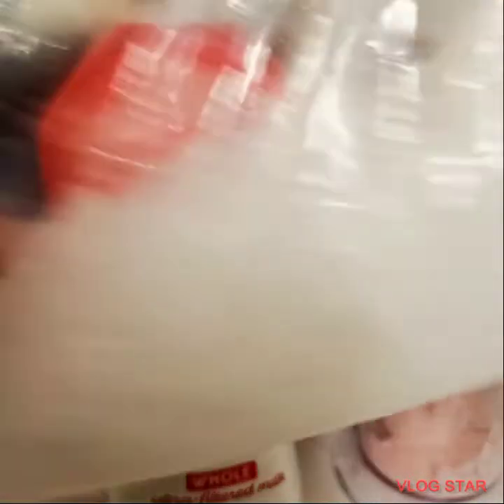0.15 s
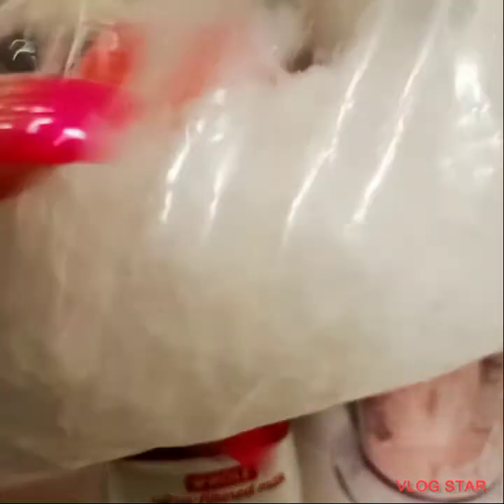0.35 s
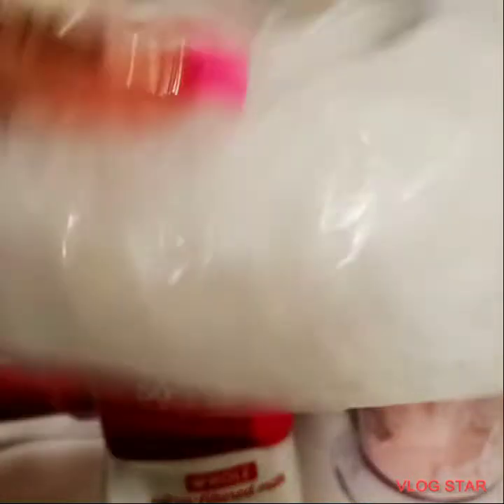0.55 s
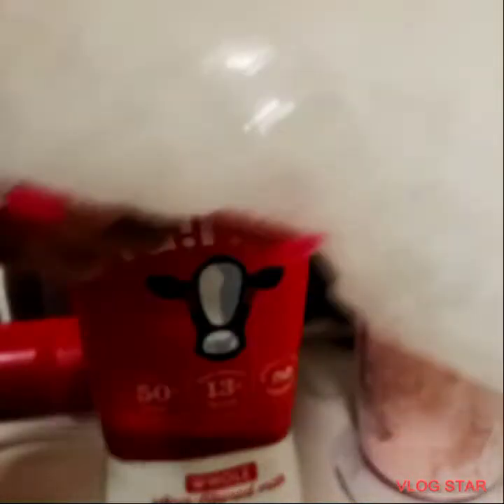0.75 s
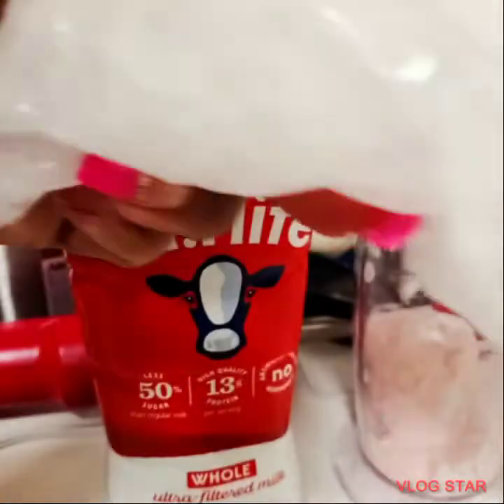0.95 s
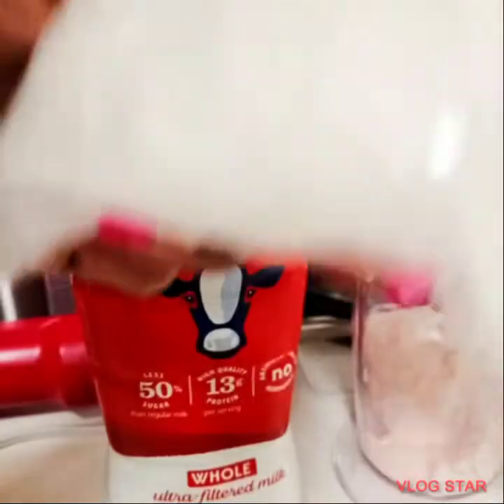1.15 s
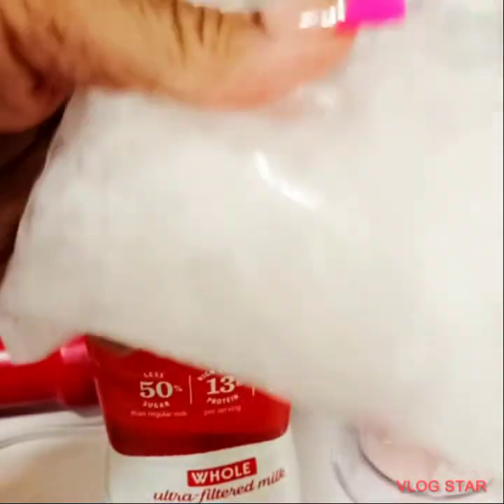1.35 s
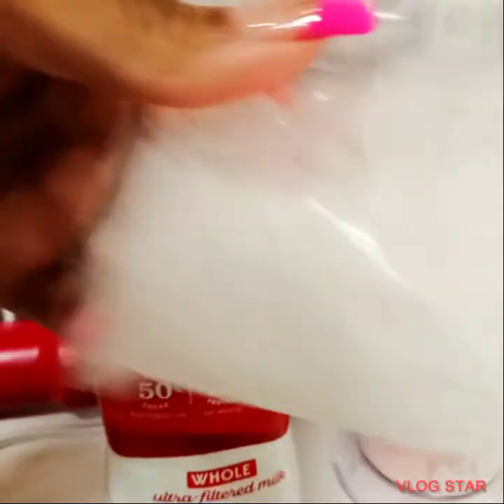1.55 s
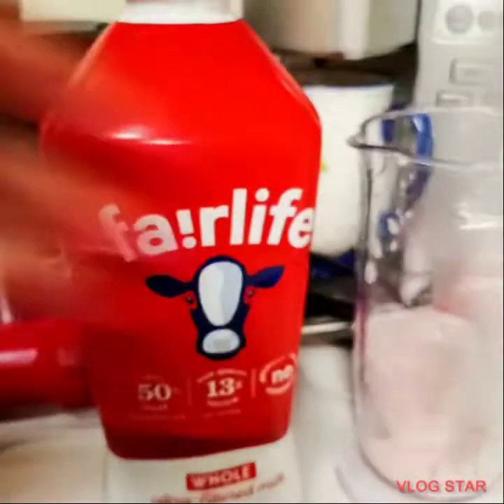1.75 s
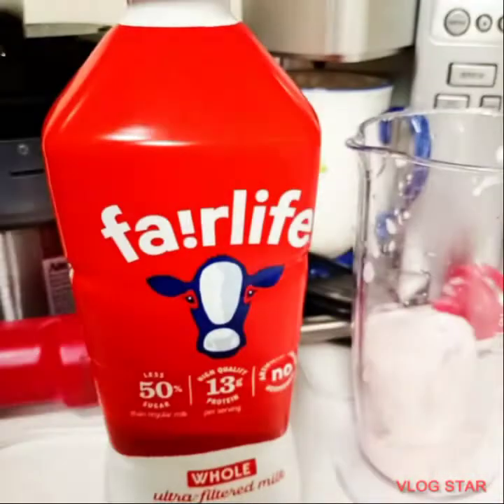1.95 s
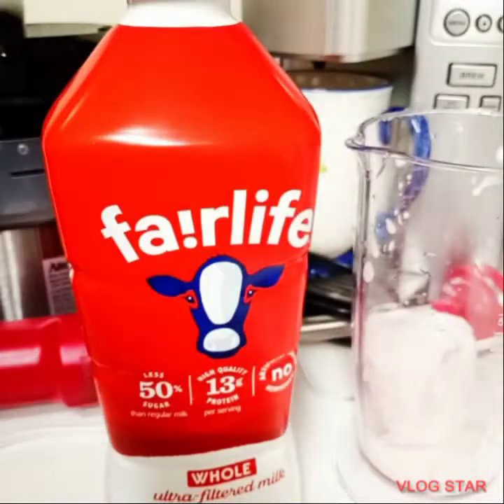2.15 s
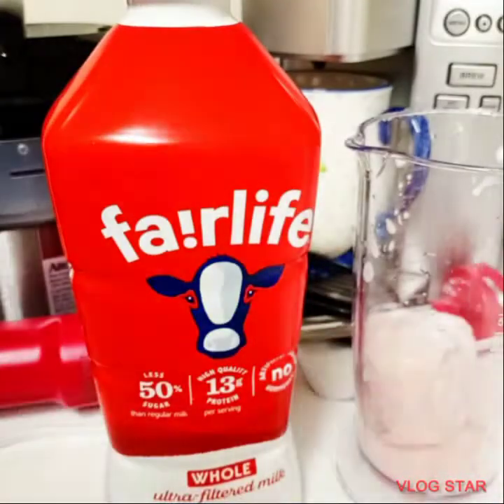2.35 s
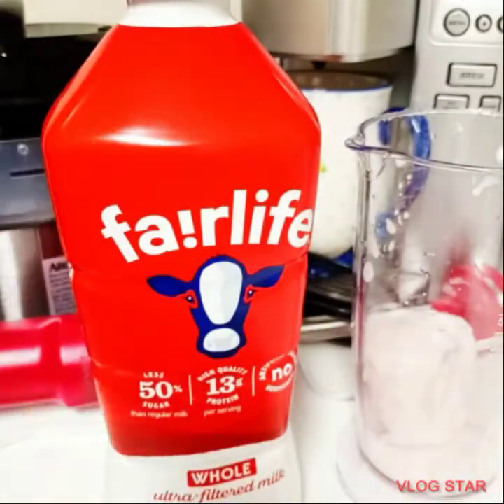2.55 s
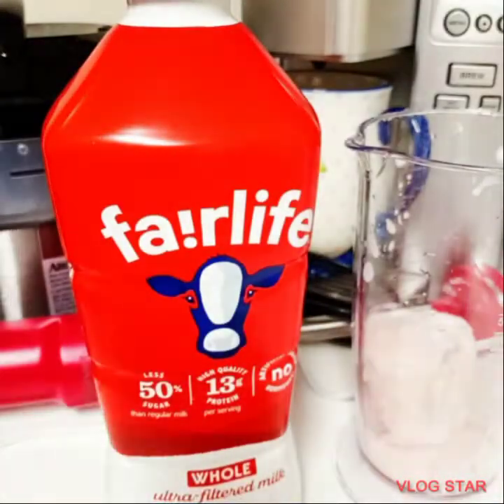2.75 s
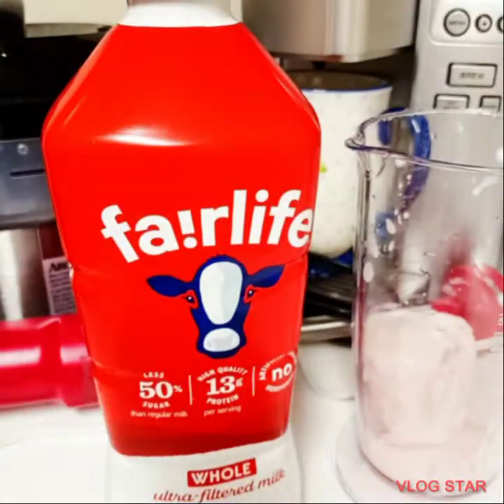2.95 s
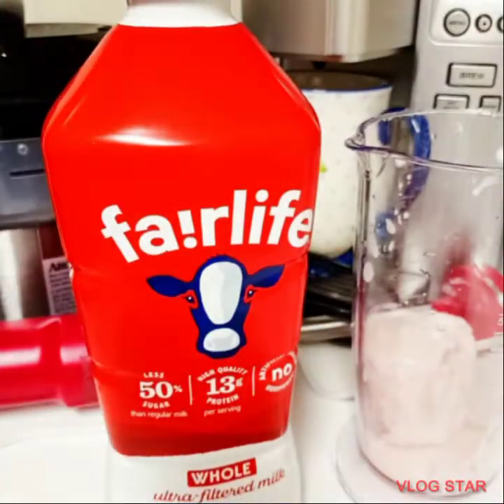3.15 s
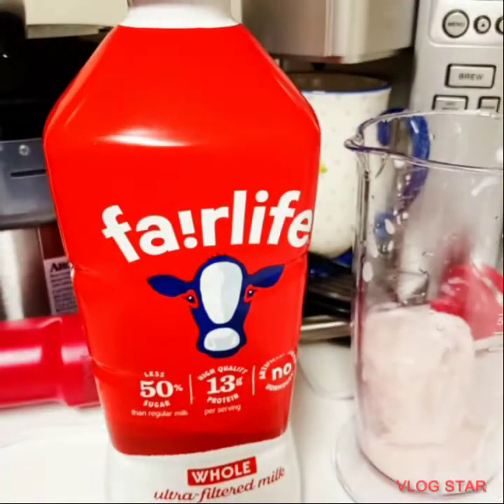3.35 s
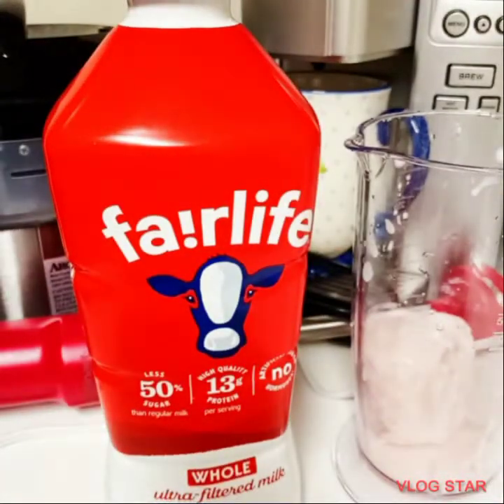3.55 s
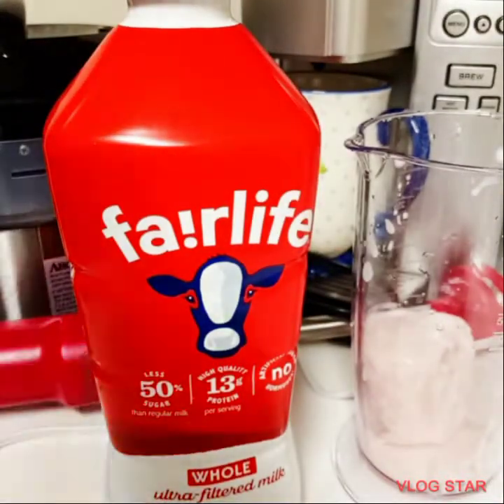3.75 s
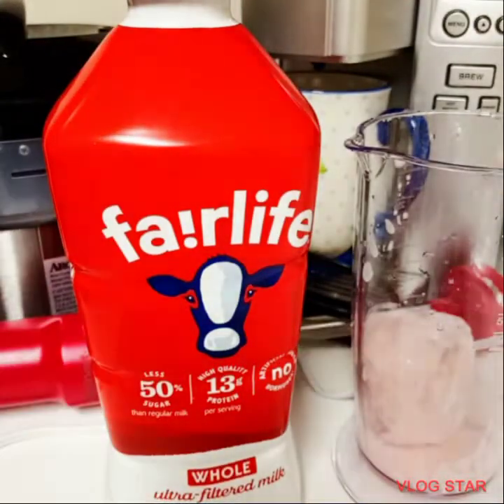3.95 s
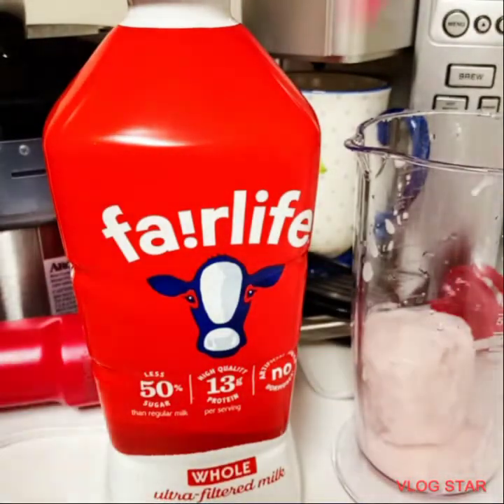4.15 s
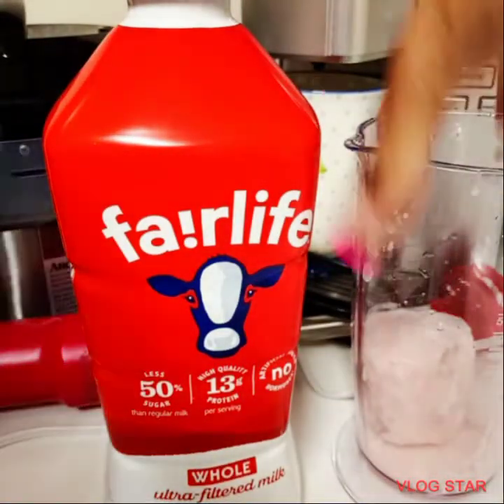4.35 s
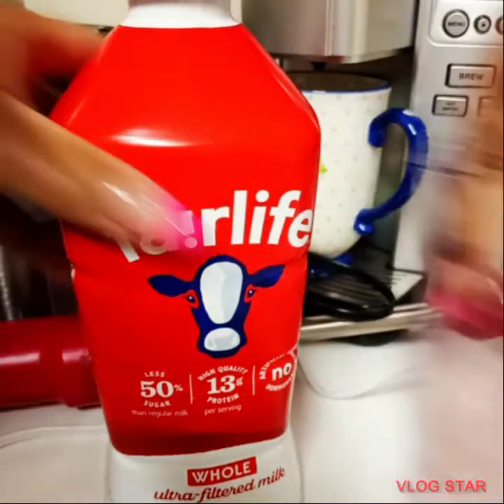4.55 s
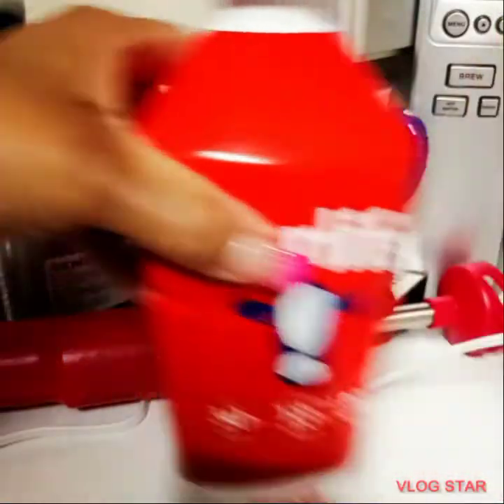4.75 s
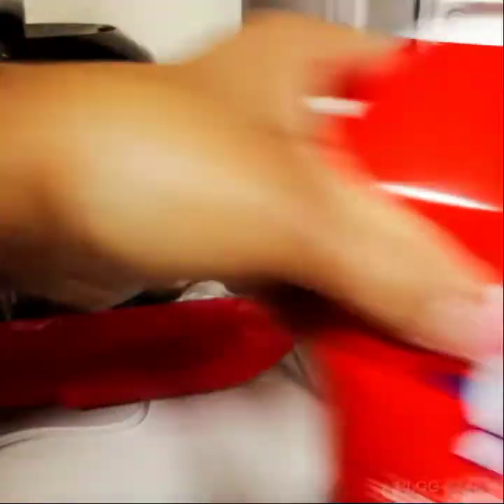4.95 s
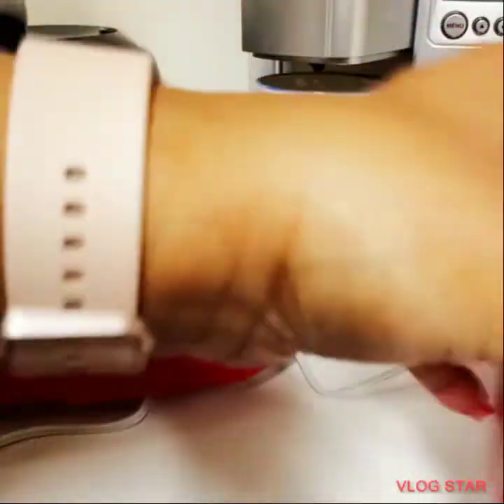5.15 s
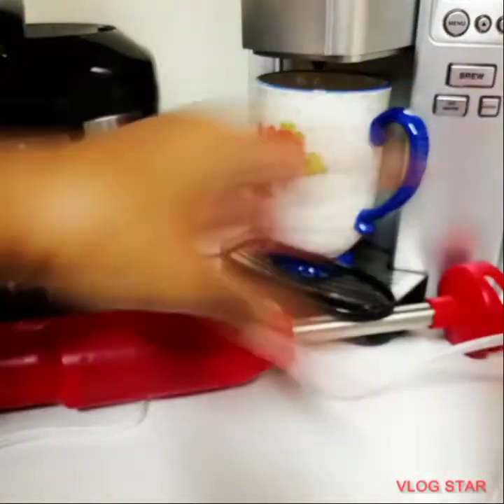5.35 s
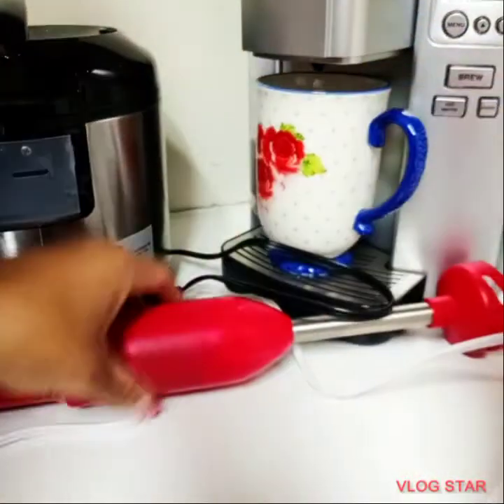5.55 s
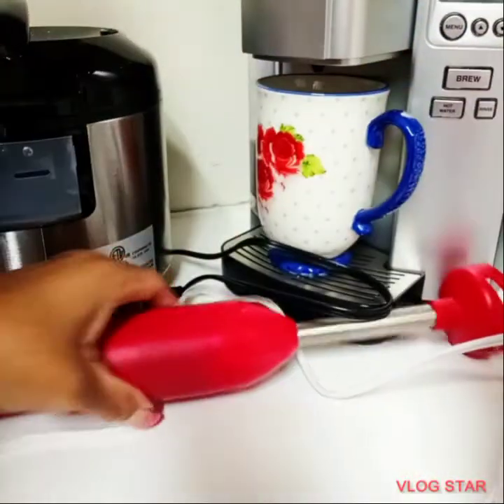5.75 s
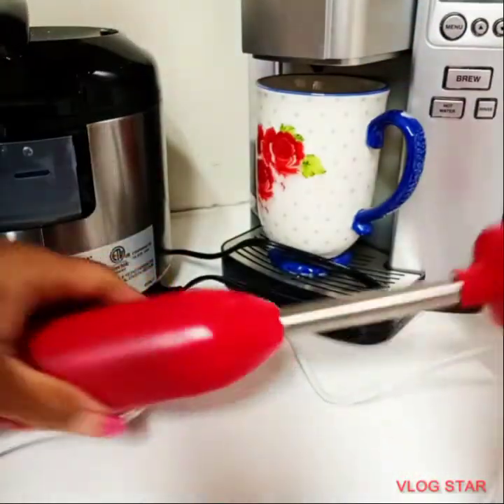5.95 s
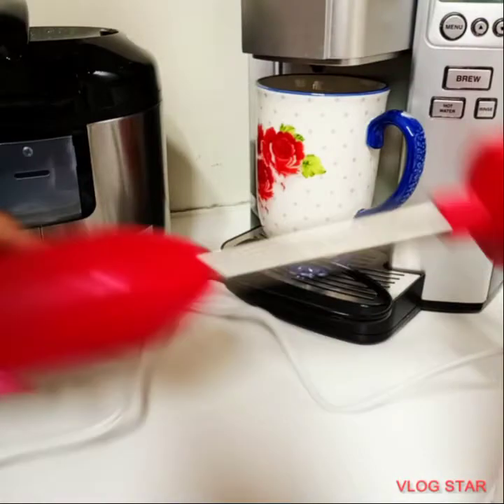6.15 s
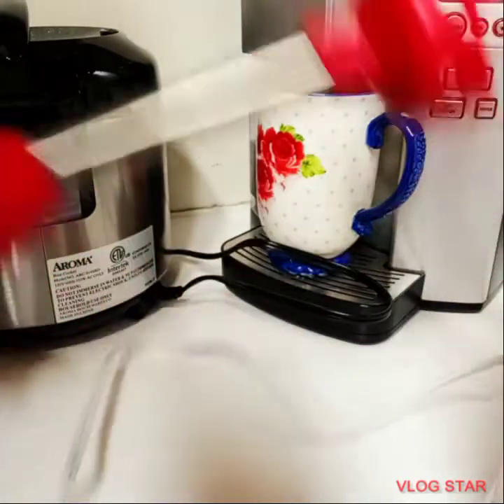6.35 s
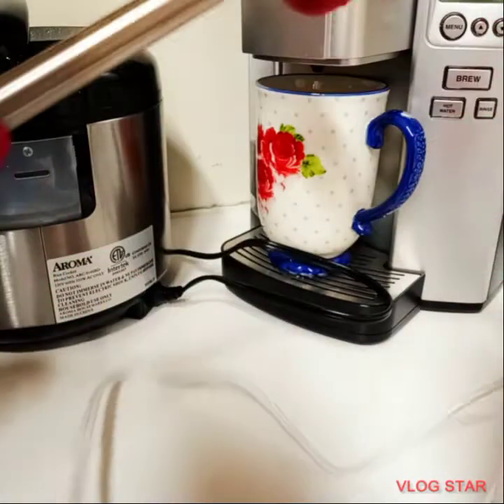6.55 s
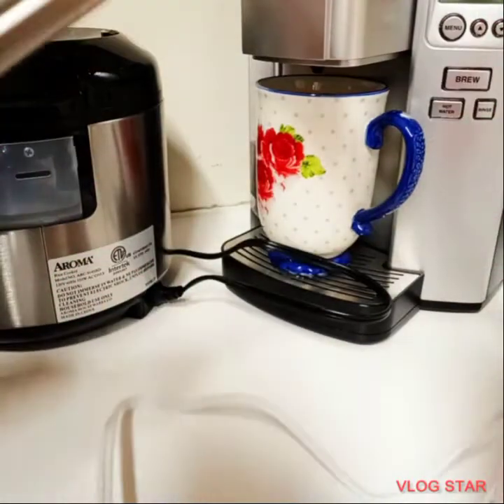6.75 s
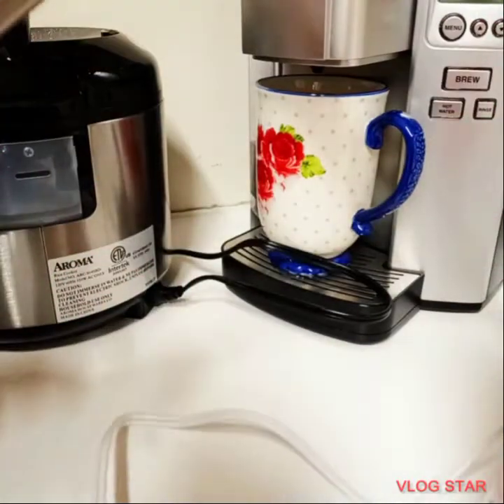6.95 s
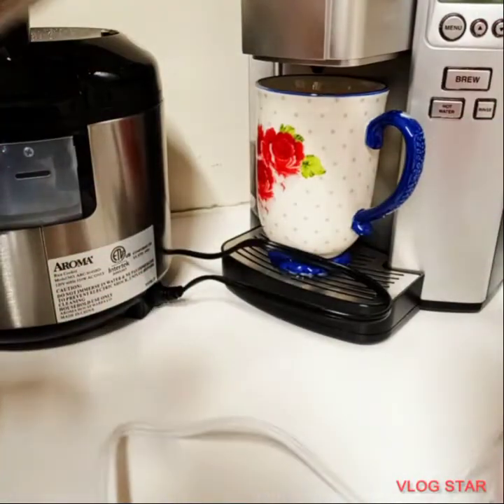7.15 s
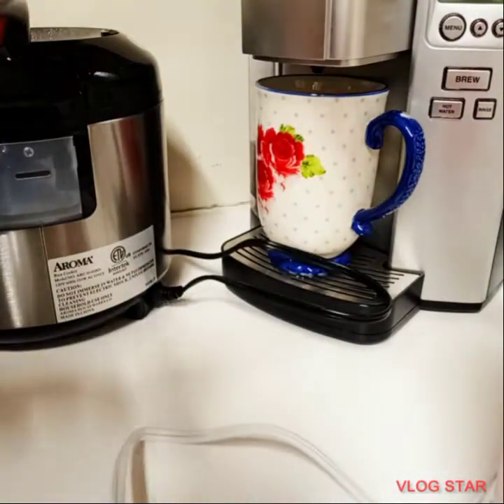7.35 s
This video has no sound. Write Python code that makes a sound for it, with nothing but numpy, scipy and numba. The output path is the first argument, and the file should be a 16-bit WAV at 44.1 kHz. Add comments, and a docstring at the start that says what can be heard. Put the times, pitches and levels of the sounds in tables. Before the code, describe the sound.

Close, crisp ice-bag rustling and snapping, a heavy drop, a quiet pause, then plastic sliding, sharp taps and a dragging cable in a kitchen.

```python
"""Crushed ice crunches and crackles in a film bag kneaded close to a phone on a kitchen worktop, then drops
aside; a plastic bottle and beaker scrape away, a stick blender is lifted and rattles, its cable drags behind.
Contact sounds are pings: dense rain for rustle and scrape, narrow for resonances, longer for squeaks and thuds.
A small hard room adds a decaying noise tail; shaped noise, a sine hum and a whine make the background."""
import sys
import numpy as np
from scipy import signal
from scipy.fft import rfft, irfft, next_fast_len
from scipy.io import wavfile
from scipy.ndimage import uniform_filter1d, map_coordinates
from numba import njit

SR = 44100
rng = np.random.default_rng(int(sys.argv[2]) if len(sys.argv) > 2 else 0)


def store_pcm(level_fs):
    """Save levels as 16-bit WAV."""
    pcm = np.round(np.clip(level_fs, -1, 1) * 32767).astype(np.int16)
    wavfile.write(sys.argv[1], SR, np.atleast_2d(pcm).T)


N = 330309
HZ = np.fft.rfftfreq(next_fast_len(N + SR), 1 / SR)
HANDLING_TRIM_DB = -3.5  # on bag, bottle and cable; their table levels are before this trim
BAG_PAN_DB, CABLE_PAN_DB = 0.1, 2.5  # left minus right


def undb(db):
    """Level in dB to amplitude factor."""
    return 10 ** (np.asarray(db) / 20)


def on_log(hz, table):
    """Read (Hz, value) rows on a log-frequency axis."""
    f, v = np.transpose(table)
    return np.interp(np.log(np.maximum(hz, 1)), np.log(f), v)


def mic_db(hz):
    """Colour of the phone's ports; flat below 1 kHz."""
    # response of the ports: (frequency [Hz], gain [dB])
    response = [(590, -33), (1000, -3.5), (1070, -0.5), (1350, -2), (1970, 1), (2180, -2.5), (3480, 0),
                (5610, -3), (6600, 1.5), (7250, -5), (8150, -17), (10600, -6.5), (13400, -21),
                (15100, -6.5), (16200, -16)]
    return on_log(hz, response[1:-1])


def shape(x, gain):
    """Filter by a gain per frequency bin."""
    size = next_fast_len(N + SR)
    return irfft(rfft(x, size) * gain, size)[..., :N]


def walk(rate_hz):
    """Slow chance with spread near 1."""
    k = int(SR / rate_hz)
    steps = np.repeat(rng.standard_normal(N // k + 1), k)
    return 1.3 * uniform_filter1d(uniform_filter1d(steps, k), k)[:N]


@njit
def ring(start, hz, tau, left, right, n):
    """Each ping swells and dies as t exp(-t / tau); left and right carry its size and phase at each port."""
    out = np.zeros((2, n))
    for g in range(len(hz)):
        p = np.exp(2j * np.pi * hz[g] / SR - 1 / tau[g])
        z = np.e / tau[g] + 0j  # envelope peaks at 1
        for i in range(min(int(8 * tau[g]), n - start[g])):
            out[0, start[g] + i] += i * (z * left[g]).imag
            out[1, start[g] + i] += i * (z * right[g]).imag
            z *= p
    return out


def pings(s, hz, cycles, size, pan_db, lag_ms=0.2335, wide_db=3.0):
    """Every ping comes from its own spot: it reaches the two ports at different phases and levels."""
    turn, lag, side = rng.random((len(s), 3)).T
    pan_db = pan_db + wide_db * 2 * (2 * side - 1)
    left = size * undb(pan_db / 2) * np.exp(2j * np.pi * turn)
    lag_turns = hz * lag_ms / 1000 * 2 * lag  # lag_ms is the mean
    right = left * undb(-pan_db) * np.exp(2j * np.pi * lag_turns)
    start = np.clip(s * SR, 0, N - 1).astype(np.int64)
    return ring(start, hz, cycles * SR / hz, left, right, N)


def ping_energy(hz, cycles):
    """Energy of a ping of size 1: amplitude squared times seconds."""
    return np.e ** 2 * cycles / hz / 8


def levels(s, weight, middle, main, fizz, pan_db):
    """Rows (time [s], four band levels [dB], left minus right [dB])."""
    return np.transpose(np.broadcast_arrays(s, weight, middle, main, fizz, pan_db))


def density_db(table, bands, when, hz):
    """Level per Hz at the source: each band's level is spread evenly over the band."""
    s, *band_levels_db, _ = np.transpose(table)
    per_hz = []
    for db, band in zip(band_levels_db, bands):
        heard_power = np.sum(undb(2 * mic_db(np.arange(*band))))
        per_hz.append(np.interp(when, s, db) - 10 * np.log10(heard_power))
    place = np.interp(np.log(hz), np.log(np.ravel(bands)), np.repeat(np.arange(4), 2))
    return map_coordinates(np.array(per_hz), [place, np.arange(len(hz))], order=1)


def rain(table, rate, scatter_db):
    """Times, sample places, sizes (rms 1, a few much larger) and pans of a rain of pings."""
    t0, t1 = table[0][0], table[-1][0]
    when, luck = rng.random((int(rate * (t1 - t0)), 2)).T
    when = t0 + when * (t1 - t0)
    size = undb(-scatter_db * np.log(np.maximum(luck, 1e-3)))
    pan_db = np.interp(when, *np.transpose(table)[[0, -1]])
    return when, (when * SR).astype(int), size / np.sqrt(np.mean(size ** 2)), pan_db


def rustle(table, bands, scatter_db, cycles, patchy_db, rate=14000):
    """Dense short pings of every pitch, coming in patches; rate in pings per second."""
    when, at, size, pan_db = rain(table, rate, scatter_db)
    low, high = np.sqrt(75), np.sqrt(17000)
    hz = (low + rng.random(len(when)) * (high - low)) ** 2
    share = 1 / (2 * np.sqrt(hz) * (high - low))  # share of the pings per Hz
    db = density_db(table, bands, when, hz) + patchy_db * walk(40)[at]
    size = size * undb(db) / np.sqrt(rate * share * ping_energy(hz, cycles))
    return pings(when, hz, cycles, size, pan_db)


def resonances(table, bands, modes, drift, come_go_db, rate=150):
    """Pings gathered on a few pitches that drift slightly and come and go."""
    out = 0
    for f, width_hz, over_db in modes:
        when, at, size, pan_db = rain(table, rate, 1.1)
        hz = f * (1 + drift * walk(3.3)[at])
        cycles = hz / width_hz / 5
        db = density_db(table, bands, when, hz) + over_db + come_go_db * walk(7)[at]
        size = size * undb(db) * np.sqrt(width_hz / (rate * ping_energy(hz, cycles)))
        out = out + pings(when, hz, cycles, size, pan_db)
    return out


def ticks(table, spread_ms, low_db, thin_db_oct, top_db, count=64):
    """One clear ping and a shower of splinters that thins out; the higher the ring, the weaker the low ones."""
    # pitches of the splinters: (lowest [Hz], dull [Hz], bright [Hz], highest [Hz])
    splinter_hz = (700, 2000, 4600, 11000)
    s, db, hz, dull_db, bright_db, pan_db = (np.repeat(c, count) for c in np.transpose(table))
    pan_db = np.clip(pan_db, -9, 9)
    octaves_up = np.clip(np.log2(hz / splinter_hz[1]), 0, None)
    lowest_db = dull_db + low_db - thin_db_oct * octaves_up
    splinter_db = np.array([lowest_db, dull_db, bright_db, bright_db + top_db])
    late, pitch = rng.random((len(s), 2)).T
    late_s = -np.log(late) * spread_ms / 1000
    # splinters are spread over a log pitch scale: place 0 is the lowest pitch, 3 the highest
    place = 4 * (np.arange(len(s)) % count + pitch) / count - .7
    f = np.clip(splinter_hz[0] * (splinter_hz[3] / splinter_hz[0]) ** (place / 3), 200, 17000)
    level_db = map_coordinates(splinter_db, [np.clip(place, 0, 3), np.arange(len(s))], order=1)
    shower = pings(s + late_s, f, 1.21 * (f / 2000) ** 0.23, undb(level_db - mic_db(f)), pan_db)
    k = slice(None, None, count)
    clear = pings(s[k], hz[k], 1.2, undb(db[k] - mic_db(hz[k])), pan_db[k], lag_ms=.02, wide_db=0.)
    return shower + clear


def kneading():
    """Fizz follows the film; the lumps follow film and weight of the shifting ice."""
    # kneading: (time [s], film level [dB], weight of shifting ice [dB])
    strokes = [(0.0, -33.5, -39), (0.07, -34.5, -50), (0.1, -38, -59.5), (0.12, -33, -41.5),
               (0.17, -38, -53.5), (0.22, -32, -51), (0.25, -38.5, -54.5), (0.291, -33, -54.5),
               (0.33, -45.5, -54.5), (0.37, -26, -44), (0.45, -31.5, -48.5), (0.488, -25, -41),
               (0.64, -33.5, -49), (0.681, -43.5, -46.5), (0.7, -32.5, -63.5), (0.74, -47, -55),
               (0.778, -33, -55), (0.809, -52, -71), (0.87, -49.5, -82), (1.02, -57.5, -73),
               (1.101, -41, -59), (1.27, -40, -58.5), (1.34, -43.5, -80.5), (1.4, -44.5, -51.5),
               (1.432, -33, -49.5), (1.52, -33.5, -49.5), (1.65, -45.5, -55), (1.79, -43, -55),
               (1.93, -48.5, -63.5), (2.0, -52.5, -48), (2.03, -49, -77), (2.09, -39, -56),
               (2.17, -51, -71.5), (2.37, -56.5, -83.5), (2.42, -41, -58), (2.47, -35.5, -52.5),
               (2.56, -30.5, -43.5), (2.622, -34, -50.5), (2.72, -54, -72), (2.81, -50.5, -60),
               (3.05, -68.5, -82.5), (3.2, -80, -75)]
    lumps_over_film_db, lumps_weight_share, fizz_over_film_db = -5.5, 0.37, -8
    s, film, weight = np.transpose(strokes)
    lumps = film + lumps_over_film_db + lumps_weight_share * (weight - film)
    return levels(s, weight, lumps, film, film + fizz_over_film_db, BAG_PAN_DB)


def landing():
    """The bag rushes in and lands; the treble settles first, the ice slumps once more, all comes to rest."""
    # peak levels: (weight [dB], lumps [dB], film [dB], fizz [dB])
    peak_db = (-42, -38.5, -25.5, -33)
    # settling rates: (weight [dB/s], lumps [dB/s], film [dB/s], fizz [dB/s])
    settle_db_s = (85, 110, 120, 151)
    drop_s = 3.328
    rush_s, attack_s = .13, 0.032  # before the drop
    slump_s, slump_rise_s, settle_s = 0.16, 0.023, .4  # slump and settling start and end after the drop
    rush_db, attack_db = -54.5, -33.5  # relative to peak
    slump_db, rest_db = 2, -7.5  # relative to the settling line
    since = np.array([0, slump_s, slump_s + slump_rise_s, settle_s])
    s = drop_s + np.r_[-rush_s, -attack_s, since]
    lift = np.array([0, 0, slump_db, rest_db])
    db = [peak + np.r_[rush_db, attack_db, lift - fall * since] for peak, fall in zip(peak_db, settle_db_s)]
    return levels(s, *db, BAG_PAN_DB)


def ice_bag():
    """Film and ice rustle, with steady resonances, through kneading and landing."""
    # weight, lumps, film, fizz: (low edge [Hz], high edge [Hz])
    bands = ((80, 450), (700, 1300), (1500, 7000), (8000, 16000))
    # steady resonances heard over the rustle: (frequency [Hz], width [Hz], level over the rustle [dB])
    modes = [(350, 66, -3.5), (903, 120, 8.5), (1950, 250, 1), (2834, 190, 3), (3593, 170, 0.5)]
    out = 0
    for table in (kneading(), landing()):
        out = out + rustle(table, bands, scatter_db=2.4, cycles=1.4, patchy_db=2.0)
        out = out + resonances(table, bands, modes, drift=.07, come_go_db=2.0)
    return out


def film_snaps():
    """The film snaps: a clear ping and a short shower of splinters."""
    # snaps: (time [s], ring level [dB], ring pitch [Hz], dull splinters [dB], bright splinters [dB],
    # left minus right [dB])
    snaps = [(0.1185, -26, 2870, -34.5, -32.5, -1), (0.1454, -26.5, 3550, -49.5, -32, -6),
             (0.2508, -29, 3600, -50.5, -41, -3.5), (0.2807, -23.5, 6800, -42, -33.5, 8.5),
             (0.3576, -28, 3660, -41, -30.5, -0.5), (0.3914, -28, 6300, -51, -27, -4.5),
             (0.4496, -29, 6060, -40.5, -31, -3.5), (0.4936, -26.5, 2720, -43.5, -27.5, -5.5),
             (0.5788, -29, 3720, -43.5, -38.5, -7.5), (0.6524, -36.5, 2680, -41.5, -35.5, -8),
             (0.6998, -21.5, 3770, -47, -31, -6.5), (0.7526, -35, 2940, -48, -32.5, 0),
             (0.7799, -27.5, 3300, -44, -33.5, -1), (0.8493, -28.5, 3470, -47.5, -38.5, 1.7),
             (0.9142, -39.5, 2860, -52.5, -62, -4.5), (1.0435, -39, 2580, -52, -46.5, -8),
             (1.1743, -28, 3700, -48, -35, 2), (1.5599, -28, 3040, -45, -31.5, -2),
             (1.6342, -34, 3000, -60, -37.5, -14), (1.6544, -23.5, 4150, -41, -27, -3.5),
             (1.686, -27, 7000, -42, -36.5, 0.5), (1.7877, -29, 6600, -49.5, -45, -14),
             (1.9887, -36.5, 4400, -51, -41, -6), (2.0895, -38.5, 1830, -63, -41.5, 5),
             (2.1075, -39, 1730, -44.5, -57, 1), (2.1963, -40.5, 1780, -55.5, -43.5, 4.5),
             (2.3219, -42.5, 1720, -53.5, -56, 6), (2.4079, -32, 6400, -61, -36.5, -1.5),
             (2.808, -38, 4470, -53, -46, -1), (2.8529, -40.5, 2360, -47.5, -45.5, 2)]
    return ticks(snaps, spread_ms=2.3, low_db=-12.5, thin_db_oct=1.5, top_db=-8.5)


def thuds(reach_oct=0.39):
    """The two lowest worktop modes boom and thump; of the others those nearest the knock's centre sound most."""
    # low knocks on the worktop: (time [s], knock centre [Hz], boom drive [dB], thump drive [dB],
    # knock drive [dB], damping by the hand [0-1])
    knocks = [(0.049, 222, -61, -50.5, -31.5, 0.54), (0.122, 357, -59, -34, -31, 0.53),
              (0.467, 204, -71, -51, -33, 0.43), (0.551, 231, -68, -44, -44, 0.2),
              (1.599, 233, -75, -64, -40, 0.4), (1.639, 183, -70, -54, -41.5, 0.1),
              (1.784, 285, -62, -67, -38, 0.4), (1.985, 304, -71, -60, -31.5, 0.84),
              (2.038, 299, -77, -60.5, -45, 0.45), (2.339, 453, -66, -56.5, -72, 0.5),
              (2.801, 477, -58, -47, -54, 0.16), (3.333, 370, -40, -36, -38, 0.44),
              (4.301, 162.3, -65, -56, -68, 0.23), (4.376, 223, -70, -59, -42.5, 0.3),
              (4.425, 198, -63.5, -63.5, -42.5, 0), (4.538, 175, -60, -46, -53, 0),
              (4.637, 367, -72, -70, -41, 0), (5.141, 179, -62, -67.5, -58, 0.72),
              (5.426, 158, -68, -56.5, -59, 0.37), (5.55, 406, -55.5, -51.5, -43.5, 0.6),
              (5.599, 161, -73, -57.5, -54, 0.5), (5.809, 157, -51, -35.5, -36, 0.44),
              (5.971, 300, -62, -56, -69, 0.44), (6.003, 170, -75, -61, -64, 0.35),
              (6.07, 170, -76, -58.5, -60, 0.1), (6.346, 250, -85, -81, -59, 0.1)]
    # worktop modes: (frequency [Hz], gain over the drive [dB], undamped t60 [s])
    modes = [(62, 0.5, 0.59), (120.4, 2, 0.18), (180, -5, 0.15), (247, -4.5, 0.11), (350, -7, 0.15),
             (480, 1, 0.098)]
    s, hz, boom_db, thump_db, knock_db, damp = (np.repeat(c, len(modes)) for c in np.transpose(knocks))
    f, mode_db, t60_s = np.tile(np.transpose(modes), len(knocks))
    mode = np.arange(len(s)) % len(modes)
    near = np.exp(-.5 * (np.log2(f / hz) / reach_oct) ** 2) + 0.067
    upper = np.where(mode == 1, undb(thump_db), near * undb(knock_db))
    drive = np.where(mode == 0, undb(boom_db), upper)
    cycles = f * t60_s * (1 - np.clip(damp, 0, .9)) / 14
    return pings(s, f, cycles, drive * undb(mode_db - mic_db(f)), 0., lag_ms=.3, wide_db=-2.7)


def sliding():
    """Rub and fizz follow the scrape; the fizz gains on it as the slide goes on."""
    # sliding bottle and beaker: (time [s], scrape level [dB], weight level [dB])
    strokes = [(4.199, -100, -85), (4.31, -66.5, -78), (4.36, -64, -66), (4.385, -53.5, -64),
               (4.474, -51, -61), (4.55, -44, -50.5), (4.6, -46.5, -54), (4.655, -43, -54),
               (4.695, -46, -61.5), (4.78, -50.5, -57), (4.92, -56, -65.5), (5.05, -63.5, -74),
               (5.16, -73.5, -80.5), (5.2, -100, -65)]
    rub_over_scrape_db, fizz_over_scrape_db, brighten_db_s, pan_db = -14.5, -8, 7, 1.1
    s, scrape, weight = np.transpose(strokes)
    fizz = scrape + fizz_over_scrape_db + brighten_db_s * (s - s[0])
    return levels(s, weight, scrape + rub_over_scrape_db, scrape, fizz, pan_db)


def bottle_and_beaker():
    """Plastic scrapes and rings along; grip and contact move its resonances and let them come and go."""
    # weight, rub, scrape, fizz: (low edge [Hz], high edge [Hz])
    bands = ((80, 650), (900, 2000), (2400, 7000), (8000, 16000))
    # resonances of the plastic: (frequency [Hz], width [Hz], level over the scraping [dB])
    modes = [(200, 35, 3), (355, 30, 4), (540, 35, 7), (700, 60, -2), (2700, 160, 2), (3200, 180, 4),
             (4400, 220, 4), (6600, 250, 2)]
    scrape = rustle(sliding(), bands, scatter_db=1.9, cycles=2.5, patchy_db=1.3)
    return scrape + resonances(sliding(), bands, modes, drift=.04, come_go_db=3.5)


def rattling():
    """Each rattle jumps up and falls away steadily; in each band the loudest at each moment is heard."""
    # loose parts of the blender after a knock: (time [s], drone peak [dB], scrape peak [dB], fizz peak [dB])
    rattles = [(5.55, -58, -53, -59), (5.664, -64, -52, -70), (5.765, -67, -50, -68),
               (5.802, -37.5, -41.5, -49), (5.835, -50, -62, -75), (5.856, -52, -76, -55)]
    rise_db_s, fall_db_s, weight_over_drone_db = 3996.5, 698, -4.5
    at, *peaks = np.transpose(rattles)
    s = np.arange(5.5, 5.95, .002)
    since = s[:, None] - at
    fade = np.where(since < 0, rise_db_s * since, -fall_db_s * since)
    drone, scrape, fizz = (np.max(db + fade, axis=1) for db in peaks)
    return levels(s, drone + weight_over_drone_db, drone, scrape, fizz, CABLE_PAN_DB)


def dragging():
    """A hand slides on the blender, then the cable drags; the drone follows the scrape."""
    # hand and cable: (time [s], scrape level [dB], treble level [dB])
    strokes = [(5.42, -85, -64.5), (5.52, -72.5, -67), (5.6, -76, -86), (5.64, -59, -67),
               (5.72, -64, -72.5), (5.79, -64.5, -68.5), (5.88, -71.5, -87), (5.949, -78, -100),
               (6.02, -83, -91.5), (6.129, -71, -72), (6.27, -63.5, -80), (6.39, -63, -65.5),
               (6.52, -62, -74.5), (6.64, -65.5, -80), (6.79, -66, -65.5), (6.92, -94, -104),
               (7.04, -79, -97.5), (7.12, -81.5, -80.5), (7.2, -91.5, -100), (7.35, -100, -105)]
    weight_db, drone_over_scrape_db = -76, -5.5
    s, scrape, treble = np.transpose(strokes)
    return levels(s, weight_db, scrape + drone_over_scrape_db, scrape, treble, CABLE_PAN_DB)


def blender_and_cable():
    """Rattling parts and dragging cable; the blender rings along, its resonances moved by grip and contact."""
    # weight, drone, scrape, fizz: (low edge [Hz], high edge [Hz])
    bands = ((80, 450), (550, 1100), (1300, 3400), (4500, 16000))
    # resonances of the blender: (frequency [Hz], width [Hz], level over the rustle [dB])
    modes = [(300, 80, 2), (668, 90, 2), (1080, 100, 1), (1650, 200, 1), (1950, 220, 1), (3100, 300, 1),
             (5800, 500, 0)]
    out = 0
    for table in (rattling(), dragging()):
        out = out + rustle(table, bands, scatter_db=2.2, cycles=1.95, patchy_db=2.0)
        out = out + resonances(table, bands, modes, drift=.05, come_go_db=2.0)
    return out


def taps():
    """Nails and hard plastic tap: a clear ping and a looser shower of splinters."""
    # taps: (time [s], ring level [dB], ring pitch [Hz], dull splinters [dB], bright splinters [dB],
    # left minus right [dB])
    hits = [(4.0626, -66.5, 1830, -69, -90, 4.4), (4.2278, -68.5, 1480, -81, -71, 2.7),
            (4.52, -26, 6660, -79, -30.5, 0.48), (4.6817, -28, 6680, -93, -40, 1.0),
            (4.789, -34, 4470, -51, -45, 5.2), (5.134, -53, 2600, -81, -59, 4.7),
            (5.4064, -20, 6080, -37.5, -25.5, 1.9), (5.5325, -45, 2590, -56.5, -50.5, 3.2),
            (5.5477, -42, 1640, -51, -56, 3.8), (5.6567, -41, 3290, -45.5, -51, 1.7),
            (5.6718, -44.5, 1030, -54, -67.5, 2.9), (5.7565, -46, 2120, -49, -56, 4),
            (5.7984, -24, 1067, -30.5, -45.5, 2.4), (5.8491, -51, 654, -54, -52, 2.2),
            (6.3076, -44, 2300, -49, -67.5, 4.5), (6.6064, -55, 5070, -76, -53, 3.7),
            (7.0736, -66, 1360, -73.5, -76, 4.0), (7.228, -56, 851, -61, -79, 9.6)]
    return ticks(hits, spread_ms=4.1, low_db=-9, thin_db_oct=23.5, top_db=-8)


def squeaks(rate=200, width_hz=85., waver=.025):
    """Plastic or skin catches and sings for a moment: long pings on one slightly wavering pitch."""
    # squeaks: (start [s], end [s], pitch [Hz], level [dB])
    catches = [(2.801, 2.92, 455, -65), (4.372, 4.43, 1090, -68.5), (4.503, 4.571, 1190, -66),
               (4.699, 4.778, 550, -54.5), (4.838, 4.922, 550, -61), (4.975, 5.111, 1950, -68),
               (5.032, 5.116, 1140, -72), (5.149, 5.219, 350, -74), (5.662, 5.77, 2010, -65),
               (6.094, 6.175, 1086, -73.5), (6.20, 6.297, 1687, -65), (6.618, 6.79, 1675, -74),
               (6.966, 7.072, 2440, -83), (7.092, 7.209, 1616, -78.5)]
    out = 0
    for t0, t1, f, db in catches:
        when, at, size, pan_db = rain([(t0, 1.), (t1, 1.)], rate, 0.74)
        hz = f * (1 + waver * walk(15)[at])
        cycles = hz / width_hz / 5
        size = size * undb(db - mic_db(f)) / np.sqrt(rate * ping_energy(hz, cycles))
        out = out + pings(when, hz, cycles, size, pan_db)
    return out


def room(x):
    """Decaying noise, other for each port; the treble dies first."""
    t60_low_s, t60_high_s = 0.28, 0.17
    tail_db = -6  # before the bass cut
    t = np.arange(SR // 2) / SR
    noise = rng.standard_normal((2, len(t))) * np.clip(t / 0.0026, 0, 1)
    low = signal.lfilter(*signal.butter(1, 2500, fs=SR), noise)
    tail = low * undb(-60 * t / t60_low_s) + (noise - low) * undb(-60 * t / t60_high_s)
    tail = tail / np.sqrt(np.sum(tail ** 2) / 2)
    tail = signal.lfilter(*signal.butter(2, 300, "high", fs=SR), tail)
    return undb(tail_db) * signal.fftconvolve(x, tail, axes=1)[:, :N]


def kitchen():
    """Room noise, nearly alike at both ports in the bass, under a wavering fridge hum and a faint whine."""
    # relative spectrum of the room noise: (frequency [Hz], density [dB per Hz])
    spectrum = [(15, -45.5), (25, -15), (55, -3.5), (145, -15.5), (180, -9.5), (206, -15), (293, -12),
                (384, -22), (427, -18.5), (1230, -31.5), (1480, -31), (1650, -34.5), (16000, -54.5)]
    # fridge hum: (frequency [Hz], mean level [dB rms])
    hum_tones = [(58, -87.5), (118, -81), (350, -83.5)]
    # whine: (time [s], mean level [dB rms])
    whine_levels = [(2.8, -110), (3.2, -94.5), (3.75, -93.5), (4.0, -83.5), (4.45, -102), (5.9, -104),
                    (6.05, -85), (6.3, -110)]
    air_db, whine_hz = -72.5, 1470
    t = np.arange(N) / SR
    mid, side = rng.standard_normal((2, N)) * undb(0.88 * walk(2.1))
    colour = undb(on_log(HZ, spectrum))
    colour = colour * undb(air_db - mic_db(HZ)) / np.sqrt(np.mean(colour ** 2))
    side_colour = colour * np.clip(HZ / 900, .1, 1)
    air = shape(mid, colour) + shape(side, side_colour) * np.array([[1], [-1]])
    hum = 0
    for f, db in hum_tones:
        hum_level = undb(db + 5 * walk(14) - mic_db(f))
        hum = hum + hum_level * np.sin(2 * np.pi * f * t + 2.5 * walk(12))
    whine_db = np.interp(t, *np.transpose(whine_levels)) + 2.7 * walk(9.8)
    whine = undb(whine_db - mic_db(whine_hz)) * np.sin(2 * np.pi * whine_hz * t)
    return air + np.sqrt(2) * (hum + whine)


def scene():
    """Handling, squeaks, thuds and ticks excite the room; the kitchen lies below, stronger on the left."""
    handling = ice_bag() + bottle_and_beaker() + blender_and_cable()
    near = undb(HANDLING_TRIM_DB) * handling + squeaks() + thuds()
    near = near + film_snaps() + taps()
    return near + room(near) + kitchen() * undb([[1.5], [-1.5]])


def record(dry):
    """The ports colour the treble, each a little differently; the deepest bass and the top are cut."""
    # balance of the ports: (frequency [Hz], left minus right [dB])
    balance = [(60, -3.0), (110, -3.5), (200, -2.5), (380, -0.5), (700, -1.5), (1290, 3.0), (2380, 4.5),
               (4400, 0.5), (8120, 3.5), (15000, -0.5)]
    top_hz = 16000
    port_db = mic_db(HZ) + on_log(HZ, balance) * np.array([[.5], [-.5]])
    heard = shape(dry, undb(port_db))
    heard = signal.lfilter(*signal.butter(2, 45, "high", fs=SR), heard)
    return signal.sosfilt(signal.ellip(8, .2, 60, top_hz, fs=SR, output="sos"), heard)


dry = scene()
out = record(dry)
store_pcm(out)
```